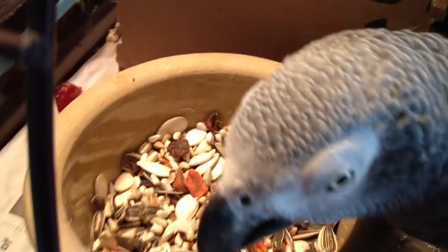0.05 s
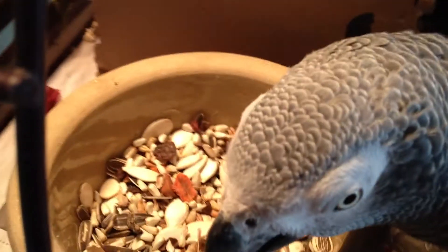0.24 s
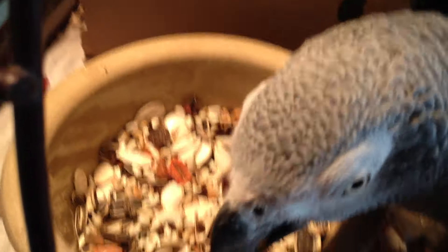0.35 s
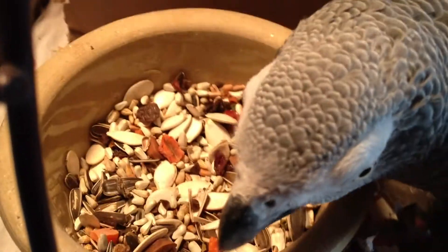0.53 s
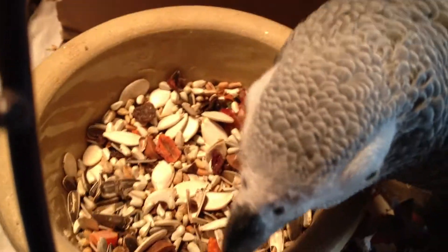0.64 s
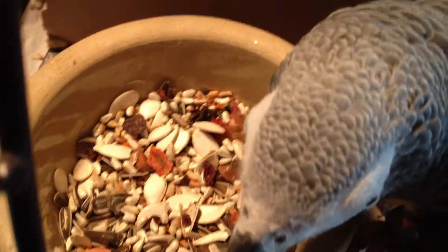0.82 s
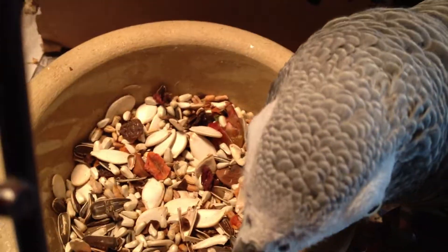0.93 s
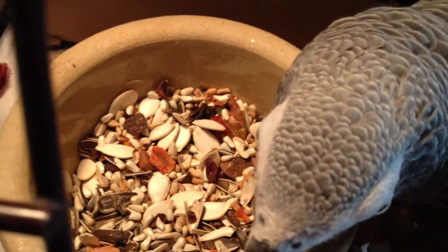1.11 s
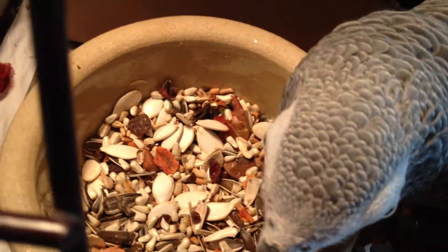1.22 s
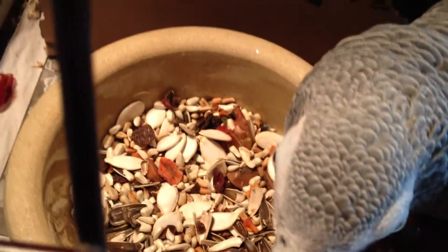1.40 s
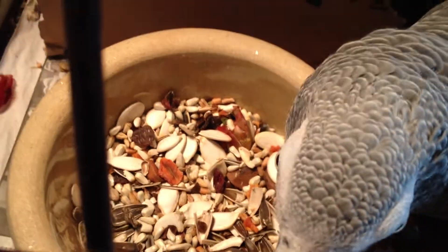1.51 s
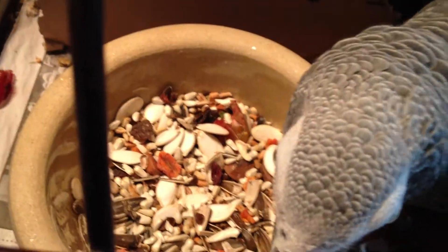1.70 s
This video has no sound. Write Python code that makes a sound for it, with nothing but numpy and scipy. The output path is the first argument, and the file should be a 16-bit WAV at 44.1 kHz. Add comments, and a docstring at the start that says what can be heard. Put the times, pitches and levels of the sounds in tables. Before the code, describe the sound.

A parrot cracks and picks through seeds in a bowl, close to the microphone. Light scrapes and ticks lead to one loud, sharp husk snap, then more picking and two runs of smaller cracks in a quiet room.

```python
"""A parrot picks through a bowl of seeds, close by, over faint room tone, hiss and hum.
First the beak scrapes and bumps, and loose seeds tick together. At 0.24 s a husk snaps loudly and rings.
More picking follows, with faint wavering tones behind it until 1 s. Two runs of smaller cracks come
near 1.2 and 1.4 s, then a few last ticks and scrapes. The picking and cracking ring the bowl
and leave a short room tail."""
import sys
import numpy as np
from scipy import signal
from scipy.fft import rfft, irfft
from scipy.io import wavfile
from scipy.ndimage import uniform_filter1d

SR = 44100
rng = np.random.default_rng(int(sys.argv[2]) if len(sys.argv) > 2 else 0)


def to_wav(sig):
    """Store sig (one row per channel, or 1-D mono) as 16-bit WAV at the path in sys.argv[1].

    Samples outside -1..1 are clipped; the rate is SR.
    """
    pcm = np.clip(np.atleast_2d(sig), -1, 1) * 32767
    pcm = np.round(pcm).astype(np.int16)
    wavfile.write(sys.argv[1], SR, pcm.T)  # frames by channels


N = 77175

# Spectra of room tone, hiss and a loose seed. Each row: frequency in Hz, relative level in dB.
TONE_COLOUR = [(25, -24.5), (50, -21), (90, -6), (125, -4), (240, 0.5), (400, -7.5), (800, -8), (1500, -11),
               (2500, -14.5), (4000, -19), (16000, -49)]
HISS_COLOUR = [(100, -23), (3000, -9), (4600, -5.5), (6200, 2), (7200, -5), (8200, -11), (9800, -7.5),
               (11800, -2.5), (14600, -1), (15300, -9.5), (15900, -26.5)]
SEED_COLOUR = [(100, -37.5), (500, -25), (1050, -40), (1600, -9.5), (2700, -24), (3600, -21), (5200, -7.5),
               (6300, 1.5), (7100, -2.5), (8000, -8.5), (9900, -9.5), (11000, -8.5), (12000, -2),
               (13000, -6.5), (14200, -8.5), (15000, -4), (16000, -25.5)]
# Drift of room tone and hiss. Each row: time in seconds, level in dB.
TONE_LEVELS = [(0, -69.5), (.25, -71.5), (.65, -68.5), (.9, -74), (1.75, -74)]
HISS_LEVELS = [(0, -74.5), (.4, -73.5), (.95, -72.5), (1.12, -74.5), (1.349, -73.5), (1.6, -71.5),
               (1.75, -80)]
# Faint tones. Each row: start and length in seconds, first and last pitch in Hz, level in dB.
WAVERS = [(0.31, .37, 2200, 1950, -77), (.28, 0.394, 370, 435, -81), (0.35, 0.627, 184, 166, -81),
          (0.76, 0.074, 280, 251, -76.5)]
# Room decay. Each row: frequency in Hz, T60 in seconds.
ROOM_DECAY = [(300, .3), (1500, .3), (6000, 0.23), (14000, 0.16)]
# Spectra of the reflections. Each row: frequency in Hz, gain in dB.
ROOM_COLOUR = [(300, -10.5), (1500, -20.5), (2500, -13.5), (6200, -18.5), (9500, -13), (11700, -26),
               (15000, -16.5)]
BOWL_COLOUR = [(500, -12.5), (1600, -10), (6000, -11), (9000, -5), (12000, -20), (15000, -13.5)]
# Resonances of the beak and a breaking husk. Each row: centre in Hz, width in Hz, gain in dB.
BEAK_MODES = [(270, 120, -18.5), (796, 400, -27), (1605, 306, -1.5), (2500, 1200, -19)]
HUSK_MODES = [(2600, 1530, -17.5), (4600, 880, -24.5), (6313, 1246, 2.5), (7800, 290, -18)]
SNAP_MODES = [(10080, 245, -11.5), (11660, 1700, 1)]
SPLINTER_MODES = [(13970, 1300, 0.00098)]
# Beak rubbing over husks. Each row: start in seconds, length in seconds, level in dB.
SCRAPES = [(.072, 0.099, -66.5), (0.171, 0.033, -57.5), (0.491, 0.031, -55.5), (0.713, 0.026, -53.5),
           (0.796, 0.036, -61), (0.876, 0.02, -61.5), (0.998, 0.064, -69.5), (1.253, 0.015, -60.5),
           (1.497, .012, -57.5), (1.579, 0.052, -62), (1.688, 0.062, -66.5)]
# Beak knocking on the heap. Each row: start in seconds, level in dB, pitch in Hz, bowl hollow in dB.
BUMPS = [(0.2041, -48, 463, -5.5), (0.2044, -44, 1250, -2), (.3412, -60, 1900, -3), (0.4, -46, 4470, -12),
         (.6809, -56.5, 860, 2), (0.8372, -52, 3300, -9), (0.849, -55.5, 750, 6), (1.2228, -49, 820, -2.5),
         (1.2635, -54, 790, -6), (1.409, -56.5, 680, -1), (1.4546, -47.5, 940, -14),
         (1.4863, -54, 2100, -6), (1.4907, -50, 880, 12)]
# Seeds colliding. Each row: start in seconds, level in dB, relative treble and body in dB, ring in Hz.
TICKS = [(0.0627, -56, 12.5, 11, 6440), (0.0842, -45.5, 15, 4.5, 6460), (.087, -46, 7, 1.5, 6300),
         (.0987, -46.5, 0, -6, 6230), (0.1148, -51.5, -10, 1, 6600), (0.131, -47.5, 2, -4, 6360),
         (0.148, -38, -0.5, 3.5, 5710), (0.1665, -46, -10, -4, 6600), (0.1766, -45.5, 4, -1, 6300),
         (0.1836, -40.5, -3, 0.5, 6300), (0.1874, -43, 3, 0, 6700), (0.2125, -38, 0, 4.5, 5940),
         (0.222, -49, 4, 4, 6300), (.229, -40.5, -5, -1.5, 6100), (.4, -44, 3, 7.5, 6400),
         (0.4017, -40, -0.5, 2.5, 6000), (0.5073, -37, 0.5, 3.5, 6400), (.516, -47, -0.5, -7, 6450),
         (0.5486, -45.5, 7, 4, 6650), (0.636, -46, 18, 0, 6060), (.7019, -66.5, 23, -10, 6900),
         (0.7205, -42, -6, -11, 6630), (0.7236, -50, 14, 16, 6060), (.74, -48, 1, -6, 6560),
         (0.7538, -33, -12, -13.5, 6360), (0.7567, -44, 17.5, 10, 6050), (0.8056, -41, -15, -8, 5870),
         (0.8371, -40, -4.5, 0.5, 5850), (0.8494, -46, 1, 1, 6330), (0.8993, -48, -8, -11.5, 5930),
         (0.9716, -49.5, 2.5, -6, 6170), (1.2229, -40, 5, 7, 6200), (1.4167, -50, 16, 10, 6260),
         (1.485, -43.5, -6, -2, 5730), (1.489, -45.5, 0, 10.5, 6100), (1.4973, -52, 14, -3.5, 5900),
         (1.71, -41, -39, -9.5, 6600), (1.721, -59.5, 14, 6, 6300)]
# Husks snapping. Each row: start in seconds, level in dB, relative snap and splinter in dB,
# beak knock level in dB, ring in Hz, fracture time in seconds.
CRACKS = [(0.2378, -15.5, 0.5, 1, -30.5, 5950, 0.00052), (1.1848, -41.5, 3.5, -5, -59, 6190, .00062),
          (1.1895, -36.5, 7, 0, -59, 5900, .0003), (1.204, -29.5, 6.5, -1, -44.5, 5840, 0.00028),
          (1.2213, -33, -3, -0.5, -54, 6110, 0.00031), (1.3984, -48, 8, 6, -66.5, 6050, .00047),
          (1.4136, -36.5, -2.5, -5, -58, 5770, .00031), (1.4311, -43.5, 18.5, 17, -57, 5860, 0.00042),
          (1.435, -39.5, 2, -5, -76, 6360, 0.00081), (1.4509, -39, 3, 6, -45.5, 6170, 0.00039),
          (1.4527, -29, 9, -7, -37.5, 5600, 0.00046)]

CLICK_SAMPLES, LEAD_SAMPLES = 2048, 64
LEAD_S = LEAD_SAMPLES / SR
BINS_HZ = np.fft.rfftfreq(CLICK_SAMPLES, 1 / SR)
HUSK_HZ, SEED_HZ = 6100, 6300  # nominal rings of HUSK_MODES and SEED_COLOUR
TICK_S = 0.00063


def amp(db):
    """Decibels to gain."""
    return 10 ** (np.asarray(db) / 20)


def unit(x):
    """Scales to rms 1."""
    return x / np.sqrt(np.mean(x ** 2) + 1e-20)


def read(points, hz):
    """Interpolates on a log-frequency axis."""
    points_hz, values = np.transpose(points)
    return np.interp(np.log(hz + 1), np.log(points_hz), values)


def add(mix, start_s, sound):
    """Mixes a sound in at a time."""
    part = mix[max(round(start_s * SR), 0):][:len(sound)]
    part += sound[:len(part)]


def coloured(x, colour):
    """Filters by a spectrum in dB."""
    return irfft(rfft(x) * amp(read(colour, np.fft.rfftfreq(len(x), 1 / SR))), len(x))


def minimum_phase(gain):
    """Spectrum of the most abrupt ring with this gain."""
    log_gain = np.log(np.maximum(np.r_[gain, gain[-2:0:-1]], 1e-5))
    return np.exp(np.conj(signal.hilbert(log_gain)))[:len(gain)]


def resonances(modes, hz=BINS_HZ):
    """Gain of broad resonances, summed in power."""
    return np.sqrt(sum((amp(db) / (1 + (2 * (hz - centre_hz) / width_hz) ** 2)) ** 2
                       for centre_hz, width_hz, db in modes))


def shelf(db, edge_hz):
    """Gain that changes by db above an edge."""
    return amp(db * BINS_HZ ** 8 / (BINS_HZ ** 8 + edge_hz ** 8))


def click(gain, burst_s, lo_hz, hi_hz):
    """A noise burst rings a colour; the band lo-hi holds the energy of 1 ms at rms 1."""
    age = np.maximum(np.arange(CLICK_SAMPLES) - LEAD_SAMPLES, 0) / SR / burst_s
    burst = rfft(rng.standard_normal(CLICK_SAMPLES) * np.sqrt(age) * np.exp(-age))
    whitened = burst / np.sqrt(uniform_filter1d(abs(burst) ** 2, size=39) + 1e-12)
    spectrum = whitened * minimum_phase(gain)
    band = spectrum[(BINS_HZ > lo_hz) & (BINS_HZ < hi_hz)]
    energy = 2 * np.sum(abs(band) ** 2) / CLICK_SAMPLES
    return irfft(spectrum) * np.sqrt(SR / 1000 / energy)


def room_noise(colour, levels):
    """Noise of one colour, drifting slowly in level."""
    level_db = np.interp(np.arange(N) / SR, *np.transpose(levels))
    return unit(coloured(rng.standard_normal(N), colour)) * amp(level_db)


def hum(hz=124.8, rms_db=-84.5):
    """Faint steady hum in the room."""
    return amp(rms_db) * np.sqrt(2) * np.sin(2 * np.pi * (hz * np.arange(N) / SR + rng.random()))


def wavers(wobble_share=0.0356, flutter_db=4.5, smooth_s=0.01):
    """Faint tones swell, glide and fade, unsteady in pitch and level."""
    out = np.zeros(N)
    for start_s, length_s, first_hz, last_hz, db in WAVERS:
        n = int(length_s * SR)
        wobble, flutter = unit(uniform_filter1d(rng.standard_normal((2, N)), int(smooth_s * SR)))[:, :n]
        hz = np.linspace(first_hz, last_hz, n) * (1 + wobble_share * wobble)
        tone = np.sin(2 * np.pi * np.cumsum(hz) / SR) * amp(flutter_db * flutter)
        add(out, start_s, amp(db) * unit(tone * signal.windows.tukey(n, .5)))
    return out


def reflections(x, bowl_t60_s=0.037, room_rise_s=0.0067):
    """Quick echoes inside the bowl, then the tail of a small room."""
    t = np.arange(SR // 2) / SR
    bowl = rng.standard_normal(len(t)) * amp(-60 * t / bowl_t60_s) * (t > .001)
    hz, frame_s, noise = signal.stft(rng.standard_normal(len(t)), SR, nperseg=256)
    decay = amp(-60 * frame_s / read(ROOM_DECAY, hz)[:, None])
    room = signal.istft(noise * decay, SR, nperseg=256)[1][:len(t)] * np.minimum(t / room_rise_s, 1)
    response = coloured(room / np.linalg.norm(room), ROOM_COLOUR)
    response += coloured(bowl / np.linalg.norm(bowl), BOWL_COLOUR)
    return signal.fftconvolve(x, response[:-CLICK_SAMPLES])[:N]


def bowl_ring(x, hz=6150, gain_db=-9, t60_s=.25):
    """Sharp clicks leave a thin high note ringing in the bowl."""
    radius = amp(-60 / SR / t60_s)
    pole = radius * np.exp(2j * np.pi * hz / SR)
    return 2 * amp(gain_db) * signal.lfilter([1 - radius], [1, -pole], x).real


def settling(ticks_per_s=48, floor_db=-72.5, spread_db=4):
    """The disturbed heap settles with very faint ticks."""
    out = np.zeros(N)
    for place, rank in rng.random((int(ticks_per_s * N / SR), 2)):
        db = floor_db - spread_db * np.log(rank + .05)
        add(out, place * N / SR, amp(db) * click(amp(read(SEED_COLOUR, BINS_HZ)), TICK_S, 4500, 8500))
    return out


def husk_gain(ring_hz, snap_db, splinter_db):
    """Colour of a husk: a ring set by its size, a bright snap, fine splinters."""
    ring = resonances(HUSK_MODES, BINS_HZ * HUSK_HZ / ring_hz)
    return ring + amp(snap_db) * resonances(SNAP_MODES) + amp(splinter_db) * resonances(SPLINTER_MODES)


def beak_scrapes(slips_per_s=2900, spread_db=3.5):
    """Rubbing: a dense run of tiny slips rings husk and beak."""
    out = np.zeros(N)
    gain = husk_gain(HUSK_HZ, snap_db=-1, splinter_db=-2.5) + amp(-9) * resonances(BEAK_MODES)
    ring = irfft(minimum_phase(gain))
    max_samples = SR // 10
    for start_s, length_s, db in SCRAPES:
        n = int(length_s * SR)
        slipping = rng.random(max_samples) < slips_per_s / SR
        size = amp(spread_db * np.minimum(rng.exponential(1, max_samples), 3))
        slips = slipping * size * rng.choice([-1, 1], max_samples)
        rub = unit(signal.fftconvolve(slips[:n], ring)[:n])
        add(out, start_s, amp(db) * rub * signal.windows.tukey(n, .25))
    return out


def beak_bumps(burst_s=0.00039, hollow_hz=1645, hollow_width_hz=560):
    """Damped knocks on the heap wake the hollow of the bowl."""
    out = np.zeros(N)
    for start_s, db, hz, hollow_db in BUMPS:
        width_hz = 360 + .25 * hz  # higher knocks are more damped
        gain = resonances([(hz, width_hz, 0), (hollow_hz, hollow_width_hz, hollow_db)])
        add(out, start_s - LEAD_S, amp(db) * click(gain, burst_s, 0, SR / 2))
    return out


def seed_ticks():
    """Pushed seeds tap their neighbours, each with its own ring."""
    out = np.zeros(N)
    for start_s, db, treble_db, body_db, ring_hz in TICKS:
        ring = amp(read(SEED_COLOUR, BINS_HZ * SEED_HZ / ring_hz))
        gain = ring * shelf(treble_db, 9000) * shelf(-body_db, 4500)
        add(out, start_s - LEAD_S, amp(db) * click(gain, TICK_S, 3700, 10000))
    return out


def husk_cracks(knock_s=.00004, knock_delay_s=0.00038):
    """Each husk gives way in a burst of tiny fractures and rings; the released beak knocks once."""
    out = np.zeros(N)
    for start_s, db, snap_db, splinter_db, knock_db, ring_hz, fracture_s in CRACKS:
        fracture = click(husk_gain(ring_hz, snap_db, splinter_db), fracture_s, 4500, 7100)
        knock = click(resonances(BEAK_MODES), knock_s, 1000, 2500)
        add(out, start_s - LEAD_S, amp(db) * fracture)
        add(out, start_s + knock_delay_s - LEAD_S, amp(knock_db) * knock)
    return out


def scene(low_cut_hz=240):
    """Beak and seeds, too small to radiate bass, with bowl and room around them."""
    low_cut = signal.butter(2, low_cut_hz, "high", fs=SR, output="sos")
    near = signal.sosfilt(low_cut, husk_cracks() + seed_ticks() + beak_bumps() + beak_scrapes())
    feeding = near + bowl_ring(near) + reflections(near)
    room = room_noise(TONE_COLOUR, TONE_LEVELS) + room_noise(HISS_COLOUR, HISS_LEVELS) + hum()
    return (feeding + room + settling() + wavers())[None]


def record(dry, edge_hz=15750):
    """Low-pass band limit."""
    low_pass = signal.firwin(161, edge_hz, window=("kaiser", 9), fs=SR)
    return signal.oaconvolve(dry, low_pass[None], "same")


dry = scene()
out = record(dry)
to_wav(out)
```